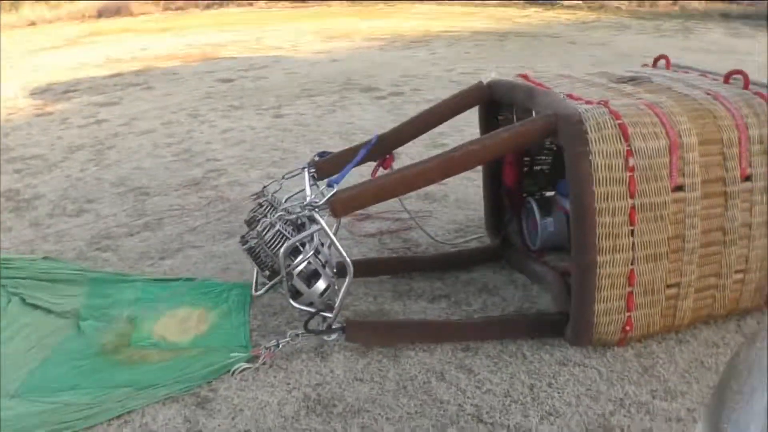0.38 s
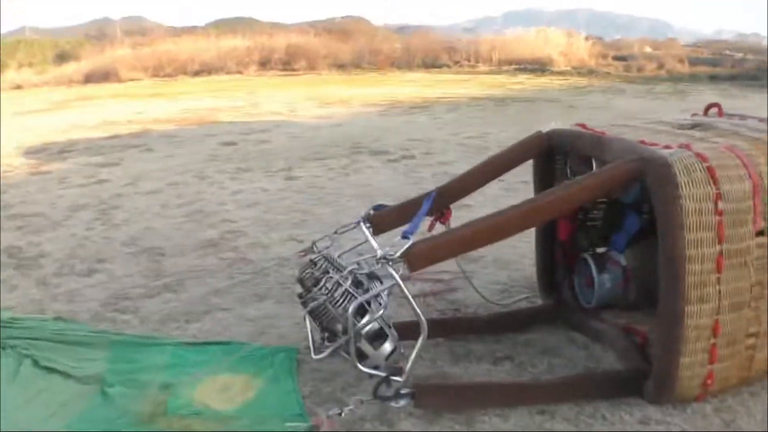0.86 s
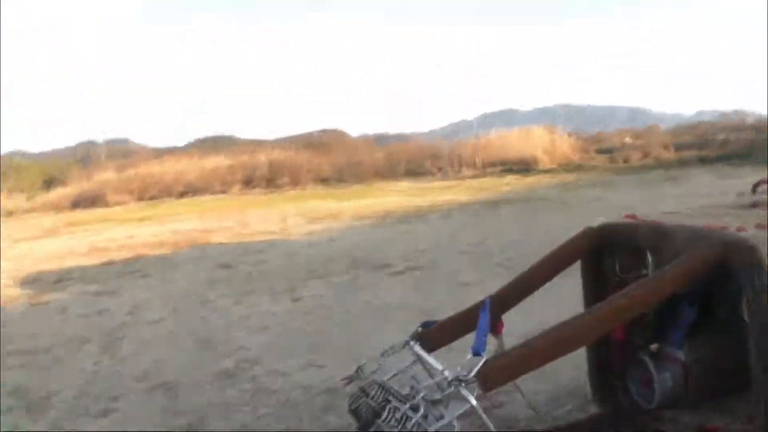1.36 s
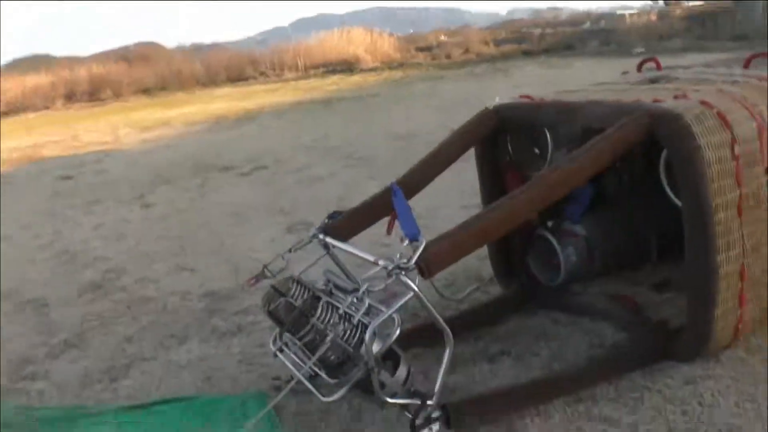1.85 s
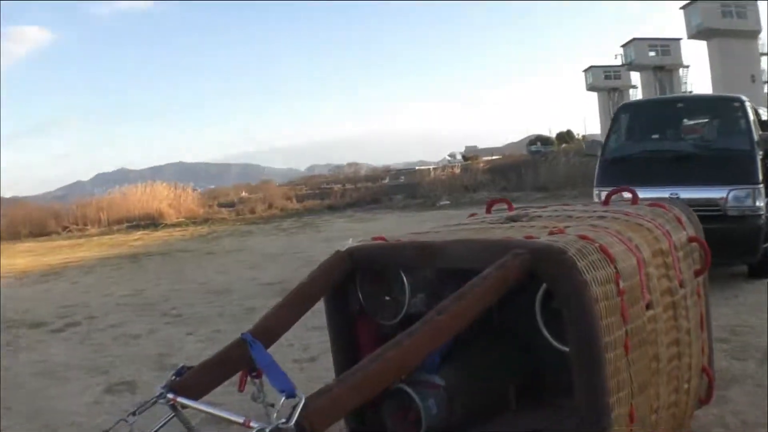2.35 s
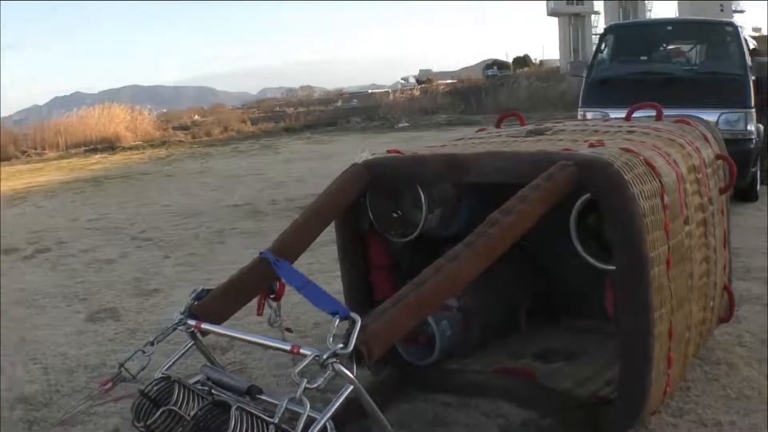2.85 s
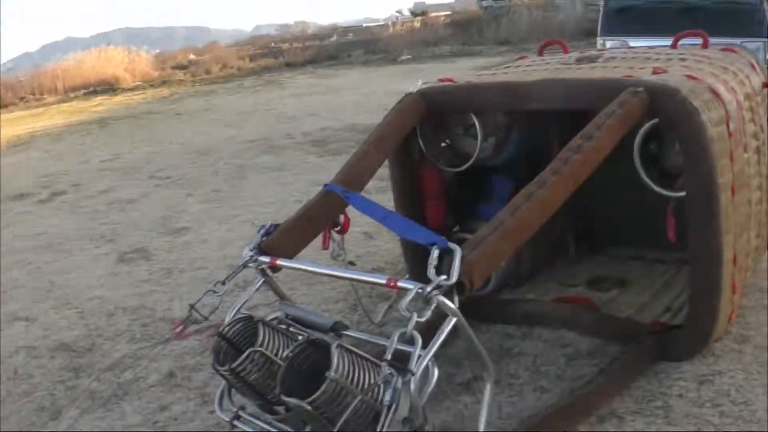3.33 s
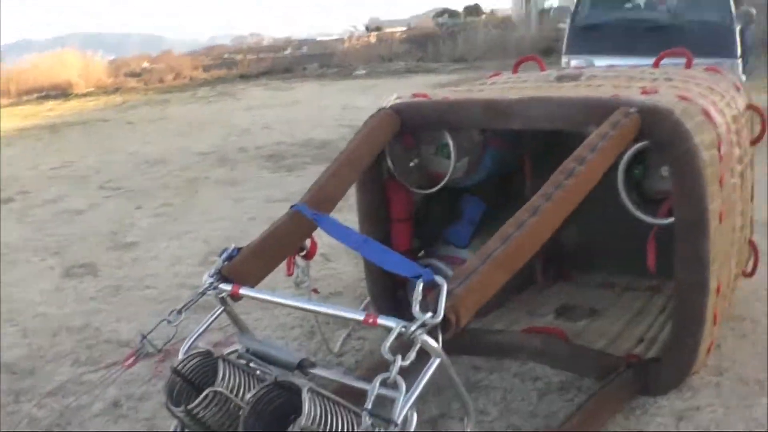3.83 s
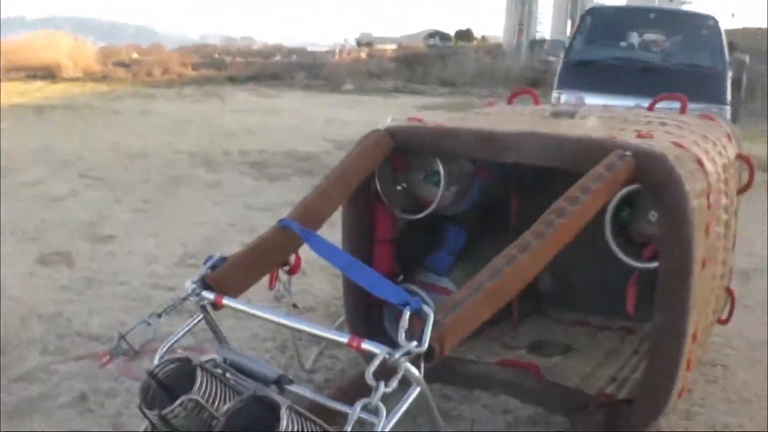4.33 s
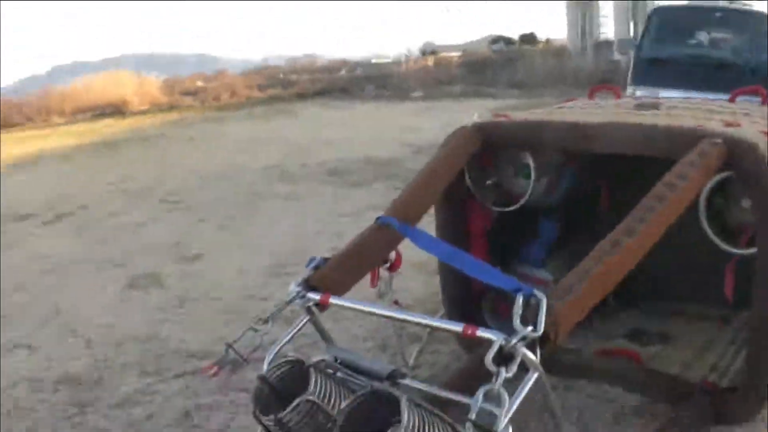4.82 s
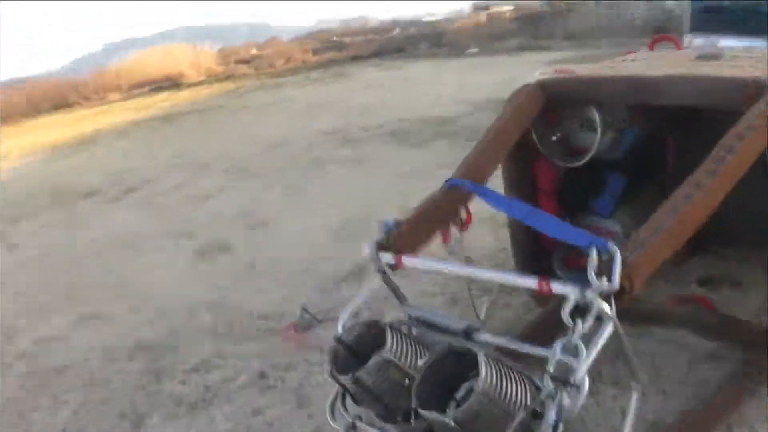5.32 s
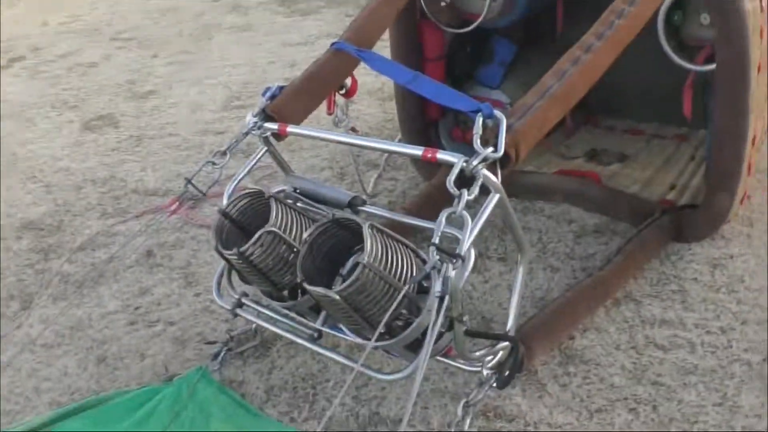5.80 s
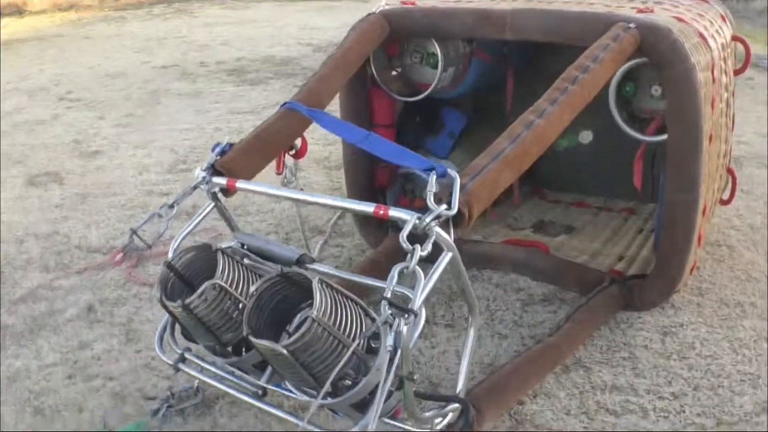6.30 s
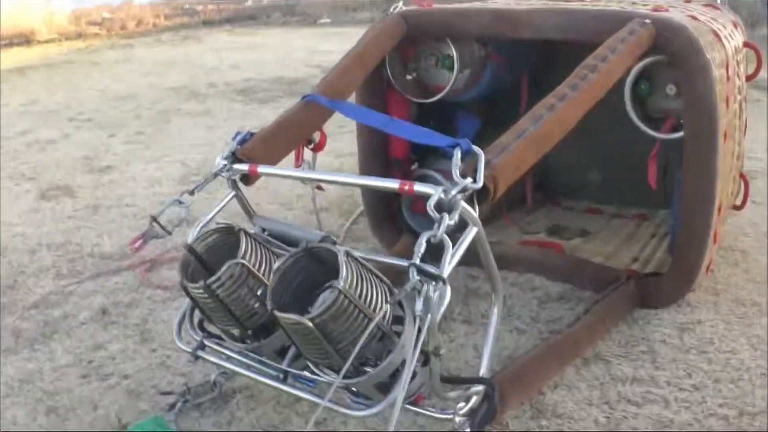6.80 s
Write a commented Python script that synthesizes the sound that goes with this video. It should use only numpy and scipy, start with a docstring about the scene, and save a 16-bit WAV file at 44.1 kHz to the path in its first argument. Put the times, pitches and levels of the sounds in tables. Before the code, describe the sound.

A faint rasp over a low steady hum opens, then close handling noise begins: sharp plastic clicks, soft hollow knocks and crumbly rubbing of fingers and cloth. The first two seconds are busy, the middle sparse, then scrapes swell before five seconds and one hard snap follows. The end is quieter. Dry open field, stereo camera microphone touched directly, no echo.

```python
"""A faint rasp over a low hum comes first, then handling clicks on the camera body and the rub of fingers and cloth.
Someone walks slowly over a dry field with a small camera. Clicks are short bursts of noise, and rubbing is
uneven friction noise; both are filtered by the resonances of the plastic case. Knocks are damped sine swings,
some of them opposite at the two microphone ports. Far traffic and open air are steady filtered noise."""
import sys
import numpy as np
from scipy import signal
from scipy.fft import rfft, irfft, next_fast_len
from scipy.io import wavfile
from scipy.ndimage import uniform_filter1d, map_coordinates

SR = 44100
rng = np.random.default_rng(int(sys.argv[2]) if len(sys.argv) > 2 else 0)


def log_audio(samples):
    """Write samples as a 16-bit WAV file to the path given in sys.argv[1]."""
    # one column per channel
    frames = np.atleast_2d(samples).T
    # limit to full scale, then quantise
    limited = np.clip(frames, -1, 1)
    pcm = np.round(limited * 32767).astype(np.int16)
    wavfile.write(sys.argv[1], SR, pcm)


def boost_factor(decibels):
    """Convert a level in decibels to a linear amplitude factor."""
    exponent = np.asarray(decibels, float) / 20
    return 10 ** exponent


N = 305172  # samples

# Frequency regions of the case's sound. Each row: centre in Hz, time for a click to decay by 60 dB in seconds.
REGIONS = [(300, 0.025), (1150, 0.019), (2800, 0.021), (6000, 0.01388), (11000, 0.01363)]
# Correlation of left and right in the sounds of the case. Each row: frequency in Hz, correlation (1 = alike).
CASE_ALIKE = [(100, 0.16), (300, 0.5), (700, 0.68), (1300, 0.26), (2400, 0.615), (4400, 0.46), (8000, 0.93),
              (15000, 1)]


def unit(x):
    """Normalisation by signal power: scales to rms 1."""
    return x / np.sqrt(np.mean(x ** 2) + 1e-20)


def along(points, hz):
    """Interpolation on a logarithmic frequency axis of (Hz, value) points."""
    point_hz, value = np.transpose(points)
    return np.interp(np.log(hz + 1), np.log(point_hz + 1), value)


def wobble(rate):
    """Slow random modulation: a smooth curve through rate random knots a second."""
    knots = rng.standard_normal(int(N * rate / SR) + 4)
    return map_coordinates(knots, [np.arange(N) * rate / SR])


def coloured(pair, gain, alike):
    """Interchannel coherence: filtered mid and side, mixed by an angle, give the wanted correlation; rms 1."""
    size = next_fast_len(N + 8192)
    hz = np.fft.rfftfreq(size, 1 / SR)
    angle = np.arccos(np.clip(along(alike, hz), -1, 1)) / 2
    spectra = rfft(pair, size) * gain(hz) * [np.cos(angle), np.sin(angle)]
    mid, side = irfft(spectra, size)[:, :N]
    return unit(np.array([mid + side, mid - side]))


def region(k, base_db, edge):
    """Modal resonance: gain over frequency of the case's modes on a flat base, within region k."""
    # Modes of the case, rubbed or struck. Each row: frequency in Hz, half width at half amplitude in Hz,
    # peak gain in dB on the scale of base_db.
    modes = [(306, 140, -7.5), (990, 49, 10), (1287, 145, 8), (1659, 320, 7), (2275, 420, 0.5),
             (2896, 119, -5.5), (3710, 665, 0.5), (5434, 1050, -0.5), (7363, 460, 2), (9300, 520, 7.5),
             (10660, 930, -2.5), (13500, 3120, 5.5)]

    def gain(hz):
        rings = sum(boost_factor(db) / (1 + ((hz - centre) / half_width) ** 2) for centre, half_width, db in modes)
        share = along([(centre, j == k) for j, (centre, _) in enumerate(REGIONS)], hz)
        low_end = 1 / (1 + (165 / (hz + 1)) ** 4)
        high_end = 1 / (1 + (hz / 15000) ** 8)
        return (boost_factor(base_db) + rings) * share ** edge * low_end * high_end  # edge steepens the crossfade
    return gain


def slips(depth_db, rate):
    """Stick-slip friction: noise whose strength flutters from slip to slip."""
    return boost_factor(depth_db * wobble(rate)) * rng.standard_normal((2, N))


def clicks():
    """Impulsive excitation: each click swells and dies within milliseconds; lower regions peak later."""
    # Handling clicks on the camera body. Each row: time of the peak in seconds, level at the middle region
    # in dB before a common 2 dB, tilt in dB per octave, arch (taken away) in dB per octave squared,
    # left over right in dB.
    click_rows = [(0.299, -48, -1, 0.2, 2), (0.4161, -43, -3.7, 0.6, -1), (0.4853, -45, 4, -0.7, 0),
                  (0.4973, -45, 1.36, -0.93, 1), (0.597, -34, 0.38, 5, 2.5), (0.6088, -27.5, -1.8, 0.5, 2),
                  (0.796, -39, 1.42, 1.5, 5), (0.8476, -22, 3, 1.1, 0.5), (0.8611, -31.5, -7, 3, 8.5),
                  (0.9143, -37.1, -3.5, 0.1, 3), (0.929, -25, 2.5, 3.5, 1), (1.034, -26, -4, 2.2, -0.5),
                  (1.128, -43, -2.5, 1, 0), (1.2547, -39.5, 4.5, 0.5, 0), (1.3697, -36, -1.0, 1.4, 0),
                  (1.3928, -40, 1.3, 1.5, 2), (1.4255, -32.5, -7.5, 1.65, -1.5), (1.4955, -33, -5, 1.6, 0),
                  (1.638, -39.5, -1, 0.4, 3), (2.0049, -34, -5.5, 2.0, 9.5), (2.1004, -21.5, 5, 1.06, -0.5),
                  (2.1378, -40.5, -1.8, 5, -1), (2.693, -40, 2.0, 0.2, -2), (2.8857, -48, -2.28, 1.1, -1),
                  (3.0099, -46.5, -5, 6, 5), (3.175, -45, 2.0, 0.49, -2), (3.27, -51.5, 4.8, -0.7, 1.5),
                  (3.2833, -37.5, 0, -0.2, -2), (3.2887, -20, -1.2, 1.0, -1.5), (3.3666, -56.5, 3, 0, -3),
                  (3.4564, -43.5, -3, 0, 1), (3.464, -39, -0.5, -0.2, 1), (3.5411, -52.4, 3, 0.78, 0),
                  (3.63, -42, -5.5, 1, 4.5), (3.6415, -26.5, 4, 0.4, 2), (3.7541, -53, 1, -0.3, -0.5),
                  (3.888, -45.5, -1.5, 0.46, 2), (4.078, -41, -3, 3, 6), (4.099, -36, 2, 1.7, 1),
                  (4.3547, -29.5, 5.5, 3.5, 1), (4.3848, -32.5, 4, 1.6, -1), (4.4133, -32.3, -0.8, 6, -1),
                  (4.4996, -46, -2, 0.5, -2), (4.752, -36.5, -1.6, 0.3, -5.5),
                  (4.7695, -29.7, 1.74, 1.8, -2), (4.7844, -31.3, -0.5, 0.53, -2),
                  (4.8207, -27.5, -2, 1.8, -6), (4.849, -33, -2, 1.5, -5.5), (5.3798, -17, -0.5, 2.5, 2),
                  (5.398, -55, 1.7, -2, 0), (5.418, -36.5, -4, 9, 3.5), (5.445, -52.9, 2.3, 0.1, 2),
                  (5.4784, -47.7, 1.6, 2.14, 2.5), (5.5417, -53, 1.3, -1, 1), (5.736, -42.5, -0.9, 8, 9),
                  (5.9017, -43.5, -2, 1.92, 0), (5.9764, -37, -4.5, 2.5, 4.5),
                  (6.0166, -40.4, 2.5, -0.1, -2), (6.1243, -57, 2.5, -0.7, 4),
                  (6.479, -32, -2.5, 1.6, -0.5), (6.5497, -41.5, -10, 3, 1)]
    middle_hz = 2800
    before, length = 512, 4096  # samples
    out = np.zeros((2, N + length))
    t = np.arange(-before, length - before) / SR
    voices = [coloured(slips(depth_db=5.0, rate=1800), region(k, base_db=-18, edge=1.14), CASE_ALIKE)
              for k in range(len(REGIONS))]
    octaves = np.log2(np.transpose(REGIONS)[0] / middle_hz)
    for s, middle_db, tilt, arch, pan_db in click_rows:
        levels = middle_db + tilt * octaves - arch * octaves ** 2
        start = round(s * SR) - before
        balance = boost_factor([[pan_db / 2], [-pan_db / 2]])
        # weak clicks build up slowly, strong ones snap
        swell_s = 0.000427 * boost_factor(-0.55 * (max(levels) + 21))
        for voice, db, (hz, t60) in zip(voices, levels, REGIONS):
            late = t - 0.4 / hz
            rise = np.exp(-abs(late) / (swell_s + 0.078 / hz))
            decay = boost_factor(-60 * abs(late) / t60)
            shape = np.where(late < 0, rise, decay)
            burst = shape * voice[:, start % (N - length):][:, :length]
            burst = burst / np.linalg.norm(burst, axis=1, keepdims=True)  # equal energy on both sides
            size = boost_factor(db + 2) * np.linalg.norm(shape)
            out[:, start:start + length] += size * balance * burst
    return out[:, :N]


def pushes():
    """Damped oscillation: a knocked panel swings for some cycles, at times in antiphase at the two ports."""
    # Knocks on the case. Each row: start in seconds, level in dB before a common 4 dB and the soft onset,
    # frequency in Hz, share at the right port (negative = opposite in sign).
    push_rows = [(0.415, -26, 300, -0.2), (0.609, -14.5, 194, -0.62), (0.9125, -24.5, 510, 0.73),
                 (0.9299, -18.5, 2340, 0.97), (1.0328, -23.5, 726, 0.83), (1.0335, -28.5, 450, 0.85),
                 (1.424, -22.5, 575, 0.94), (1.424, -22.5, 1250, 0.99), (1.4957, -28.5, 393, 0.99),
                 (2.0045, -19.5, 237.6, -0.68), (3.2884, -17, 1764, 1.05), (3.2885, -21, 1100, 0.6),
                 (3.2895, -20, 194, -0.43), (3.463, -20.5, 217, -0.28), (4.3537, -21.5, 2900, 0.9),
                 (4.3845, -26, 2940, 0.9), (4.4135, -27, 2750, .9), (5.3795, -13.5, 2810, 0.76),
                 (5.381, -23.5, 706, 0.9), (5.383, -22, 279.7, 0.94), (5.4175, -32, 2500, .7)]
    length = 4096  # samples
    out = np.zeros((2, N + length))
    t = np.arange(length) / SR
    for s, db, hz, right in push_rows:
        t60 = 0.0086 + 5.9 / hz  # slow panels swing longer
        decay = boost_factor(db + 4 - 60 * t / t60)
        onset = 1 - np.exp(-t * hz / 0.37)
        swing = decay * np.sin(2 * np.pi * hz * t) * onset
        out[:, round(s * SR):][:, :length] -= swing * [[1], [right]]
    return out[:, :N]


def rubbing():
    """Friction-driven resonance: one uneven friction drives all regions; each wavers and crumbles by itself."""
    friction = patchy(slips(depth_db=1.5, rate=300), patchy_db=2.0)
    flutter_db = 0.7 * wobble(40)
    out = np.zeros((2, N))
    for k, db in enumerate(rub_levels()):
        level = boost_factor(db - 3.0 + flutter_db + 1.04 * wobble(30))
        rubbed = coloured(friction, region(k, base_db=-9, edge=1.5), CASE_ALIKE)
        out += level * unit(crumbs()) * rubbed
    return out


def rub_levels():
    """Addition of powers: grip sets the low two regions, grip and strokes add in the high three; dB curves."""
    # Shifts of the grip on the case. Each row: time in seconds, thud (lowest region) and knock (second
    # region) levels in dB before the common shift and the wavering in rubbing().
    grip = [(0.0, -52, -45), (0.59, -41.5, -44), (0.98, -50, -40.5), (1.45, -47.5, -46),
            (1.6, -46.5, -38.5), (1.72, -51, -46), (1.98, -45.5, -44.5), (2.19, -50.5, -46),
            (2.81, -59, -52), (3.05, -50, -48.5), (3.38, -66, -55.5), (3.55, -54, -49.5),
            (3.72, -60.5, -52.5), (4.27, -46, -45), (4.46, -53.5, -50), (4.77, -41, -31.5),
            (5.17, -51.5, -48), (5.48, -54, -47.5), (5.84, -63, -53.5), (5.98, -54.5, -48.5),
            (6.3, -59, -52.5), (6.51, -48.5, -49.5), (6.71, -60, -46.5), (6.92, -52, -52)]
    # Treble of the grip: scrape, hiss and fizz (the high three regions) in dB relative to its knock.
    grip_treble_db = [-9.5, -21.5, -30]
    # Strokes of cloth and dry stalks. Each row: time of the peak in seconds, seconds to rise 10 dB,
    # seconds to fall 10 dB (both held to a shortest time), level in dB before the same shift and wavering,
    # tilt in dB from one region to the next, about an octave.
    strokes = [(0.367, 0.079, 0.021, -55, -5.5), (0.49, 0.095, 0.07, -48.5, -3.4),
               (0.607, 0.02, -0.02, -43, -4.2), (0.68, 0.274, 0.2, -53.7, -8),
               (0.778, 0.181, 0.16, -46.5, -4), (0.922, 0, 0.06, -45.5, 1.5),
               (1.035, 0.038, 0.15, -54.0, 0), (1.153, 0.03, 0.321, -44.5, -1.5),
               (1.243, 0.03, 0.044, -44.2, 0.5), (1.336, 0.03, 0.063, -41, -0.3),
               (1.504, 0.031, 0.116, -49, -3), (1.589, 0.029, 0.205, -51.5, -3),
               (1.775, 0.02, 0.1, -47, -1.8), (1.915, 0.082, 0.077, -47.5, -2.9),
               (2.02, 0.02, 0.11, -46.5, -7), (2.044, 0.039, 0.0343, -39, 3),
               (2.11, 0.03, 0.133, -57.5, 0.6), (2.288, 0.036, 0.032, -45.5, -1.5),
               (2.41, 1, 0.3, -61.5, -2.8), (2.772, 0.2, 0.021, -60.5, 1), (2.91, 0.05, 0.4, -58.5, -2),
               (3.053, 0, 0.054, -58, -1.2), (3.174, 0.018, 0.038, -55.5, 0.2),
               (3.459, 0.033, 0.029, -52, -2), (3.64, 0.12, -0.04, -54, -3), (3.822, 0.01, 0.1, -52.5, 0.5),
               (4.027, 0.01, 0.1, -49.5, -1.8), (4.088, 0.022, 0.04, -44.5, -4.5),
               (4.201, 0.028, 0.14, -46.5, -0.1), (4.314, 0.099, 0.1052, -38.5, 0.9),
               (4.39, 0.302, 0.08, -53.5, -9.5), (4.513, 0.019, 0.14, -46, -1.6),
               (4.611, 0.065, 0.133, -39, -3.5), (4.788, 0.105, 0.13, -35.0, -1),
               (4.922, 0.019, 0.14, -40.5, 0.6), (5.048, 0.04, 0.4, -56.2, -10),
               (5.212, 0.071, 0.2, -54.2, 6), (5.389, 0.074, 0.016, -45.5, 0.1),
               (5.534, 0.2, 0.08, -55.5, -1.2), (5.746, 0.065, 0.066, -58, -0.5),
               (5.919, 0.04, 0.284, -56.5, 2.5), (5.977, 0.02, 0.017, -50.2, -7),
               (6.125, 0.034, 0.047, -59.0, -10.5), (6.286, 0.115, 0.032, -63.0, -10.0),
               (6.481, 0.064, 0.03, -55.5, -1), (6.659, 0.4, 0.7, -58, -3.5)]
    # Colour of a stroke without tilt: scrape, hiss and fizz in dB relative to its level.
    stroke_colour_db = [.5, -0.57, 1]
    roundness = 1.6  # 1 = pointed swell, more = flat top and steep ends
    quickest_s = 0.008
    t = np.arange(N) / SR
    grip_s, thud, knock = np.transpose(grip)
    thud_db, knock_db = np.interp(t, grip_s, thud), np.interp(t, grip_s, knock)
    power = boost_factor(2 * (knock_db + np.c_[grip_treble_db]))
    for s, rise, fall, db, tilt in strokes:
        rising = (s - t) / max(rise, quickest_s)
        falling = (t - s) / max(fall, quickest_s)
        swell_db = db - 10 * np.where(t < s, rising, falling) ** roundness
        colour_db = np.c_[stroke_colour_db] + tilt * np.c_[[-1, 0, 1]]
        power = power + boost_factor(2 * swell_db) * boost_factor(2 * colour_db)
    return [thud_db, knock_db, *(10 * np.log10(power))]


def patchy(x, patchy_db):
    """Time-varying filtering: random gain patches a few hundred Hz tall and about 80 ms long."""
    spectrum = signal.stft(x, nperseg=256)[2]
    field = rng.standard_normal(spectrum.shape[1:])
    field = uniform_filter1d(field, size=4, axis=0)  # over frequency
    field = uniform_filter1d(field, size=28, axis=1)  # over time
    return signal.istft(spectrum * boost_factor(patchy_db * unit(field)), nperseg=256)[1][:, :N]


def crumbs():
    """Shot noise: a gain that jumps at random tiny breaks and falls back within milliseconds."""
    breaks_per_s, jump, t60_s = 150, 0.44, 0.011
    breaks = (rng.random(N) < breaks_per_s / SR) * rng.exponential(size=N)
    return 1 + jump * signal.lfilter([1], [1, -boost_factor(-60 / (t60_s * SR))], breaks)


def rasps():
    """Stick-slip at a resonance: jerky friction noise in one band, with soft ends."""
    # Rasps, where a stroke dwells on one pitch. Each row: start in seconds, end in seconds, centre in Hz,
    # half width at half amplitude in Hz, level in dB.
    rasp_rows = [(0, 0.293, 1730, 496, -53.5), (1.169, 1.249, 2840, 170, -44.5),
                 (1.18, 1.223, 4620, 200, -45.5), (1.306, 1.362, 2900, 250, -49),
                 (2.017, 2.074, 9500, 1800, -38.5), (2.022, 2.073, 7415, 250, -42),
                 (4.56, 4.658, 1340, 400, -41.5), (6.727, 6.95, 2373, 448, -47)]
    t = np.arange(N) / SR
    out = np.zeros((2, N))
    for start, end, centre_hz, width_hz, db in rasp_rows:
        band = lambda hz: 1 / (1 + ((hz - centre_hz) / width_hz) ** 4)
        tone = coloured(slips(depth_db=3.0, rate=110), band, CASE_ALIKE)
        fade = np.clip(np.minimum(t - start, end - t) / 0.014 + 0.5, 0, 1)  # 14 ms ramps
        out += boost_factor(db) * fade * tone
    return out


def air():
    """Filtered noise: the hum of distant traffic and open air, swelling a little."""
    # Spectrum of the background. Each row: frequency in Hz, relative density in dB per Hz.
    spectrum_db = [(15, -42), (25, -7.5), (97, 5), (170, 3), (210, -2.5), (290, -3), (410, -5.5),
                   (600, -12.5), (860, -10), (970, -3.5), (1400, -6.5), (2200, -7), (3300, -14),
                   (5000, -23), (15800, -22), (16500, -52)]
    # Correlation of left and right in the background. Each row: frequency in Hz, correlation (1 = alike).
    air_alike = [(30, 0.59), (110, 0.882), (600, 0.977), (1400, 1), (3500, 0.32), (7000, 0.96), (15000, 1)]
    noise = rng.standard_normal((2, N))
    hum = coloured(noise, lambda hz: boost_factor(along(spectrum_db, hz)), air_alike)
    return boost_factor(-49.5 + 2.0 * wobble(3.284)) * hum  # dB


def scene():
    """Superposition of direct sound: everything reaches the camera directly; a field has no walls."""
    return clicks() + pushes() + rubbing() + rasps() + air()


def top_cut(x):
    """Nothing passes above the cut-off."""
    return signal.sosfilt(signal.butter(12, 16820, fs=SR, output="sos"), x)


def record(dry):
    """Band limitation: the microphone fades out above its upper limit."""
    top_hz, slope_db_per_hz = 15800, -0.025
    hz = np.fft.rfftfreq(N, 1 / SR)
    heard = irfft(rfft(dry) * boost_factor(slope_db_per_hz * np.maximum(hz - top_hz, 0)), N)
    return top_cut(heard)


dry = scene()
out = record(dry)
log_audio(out)
```